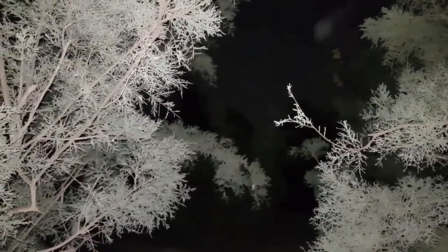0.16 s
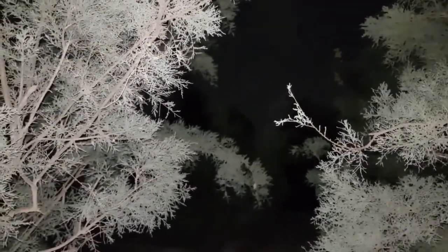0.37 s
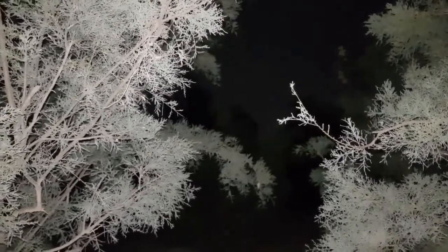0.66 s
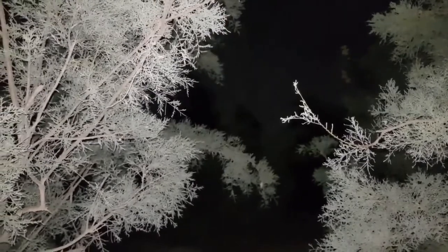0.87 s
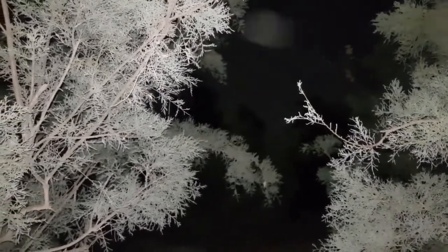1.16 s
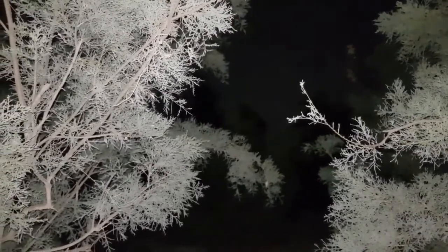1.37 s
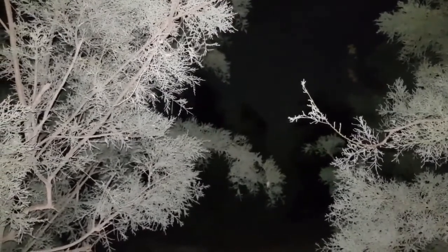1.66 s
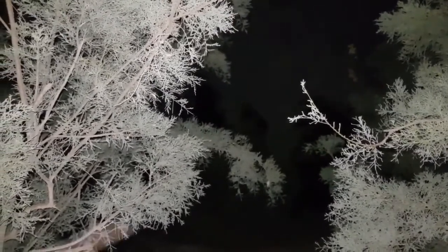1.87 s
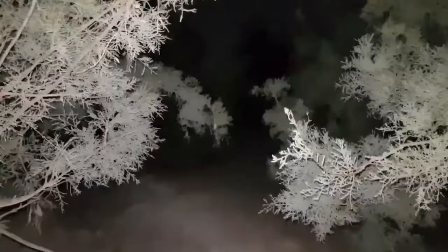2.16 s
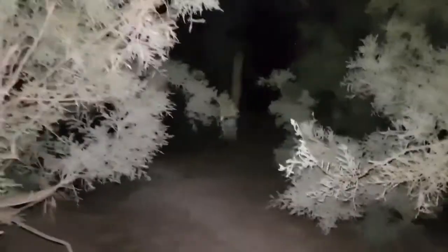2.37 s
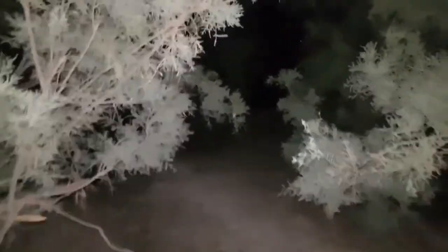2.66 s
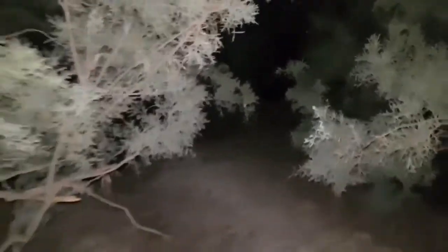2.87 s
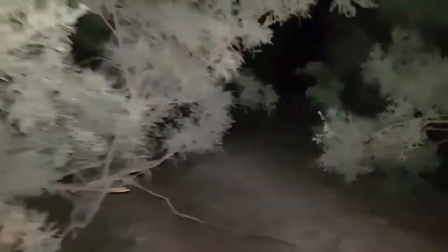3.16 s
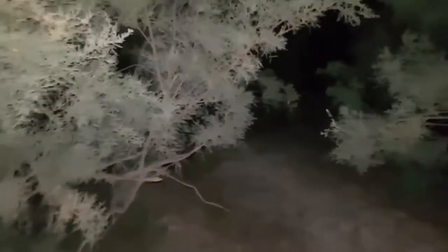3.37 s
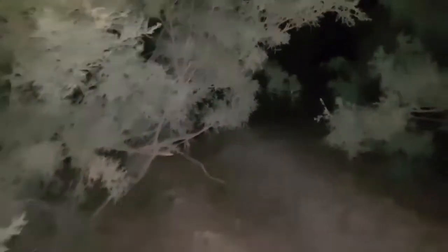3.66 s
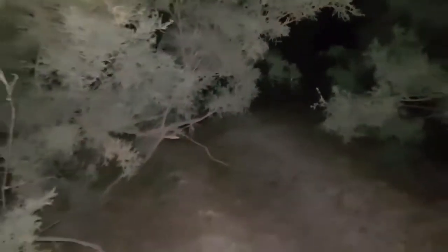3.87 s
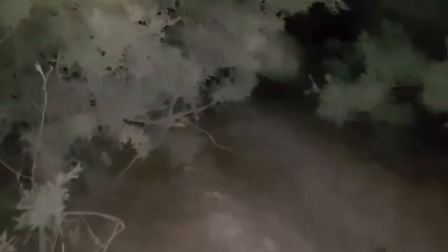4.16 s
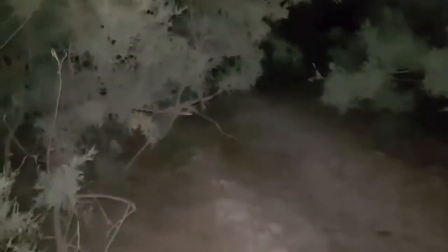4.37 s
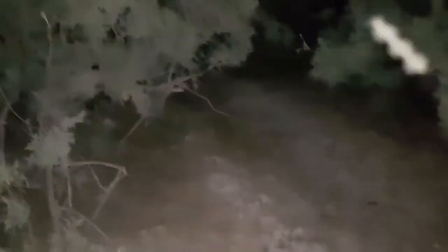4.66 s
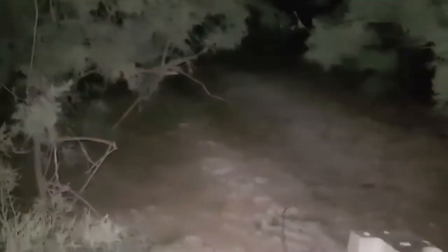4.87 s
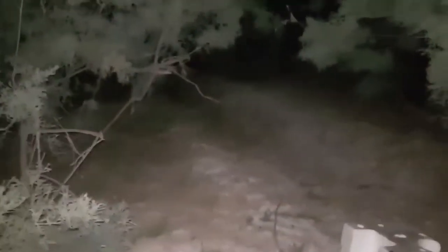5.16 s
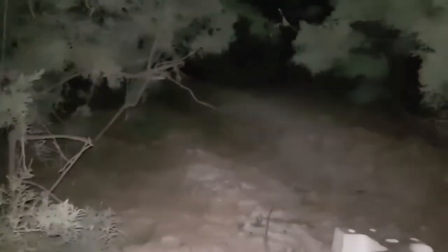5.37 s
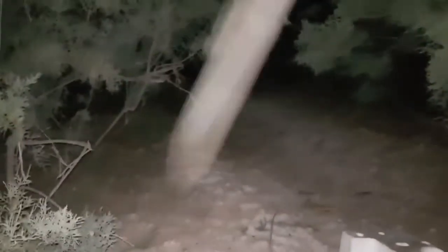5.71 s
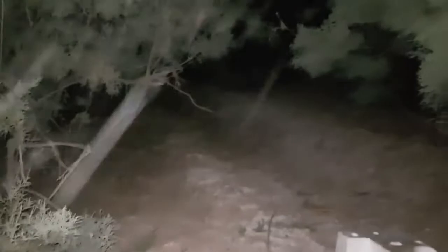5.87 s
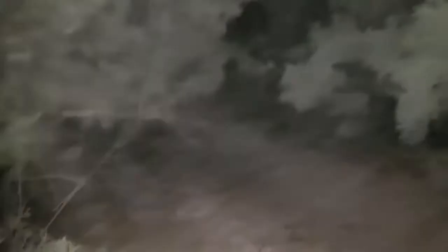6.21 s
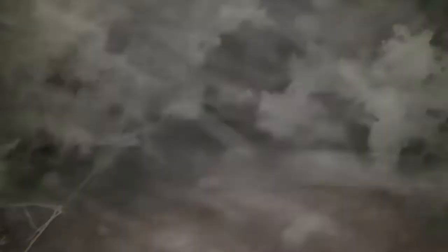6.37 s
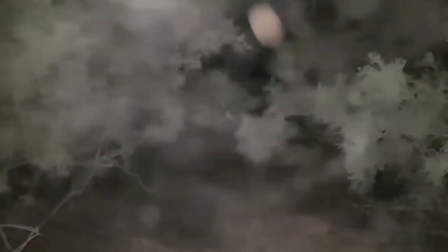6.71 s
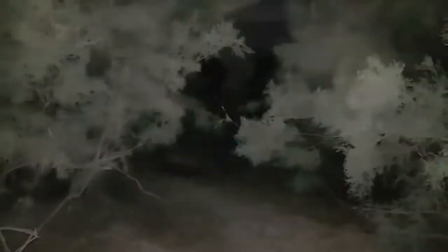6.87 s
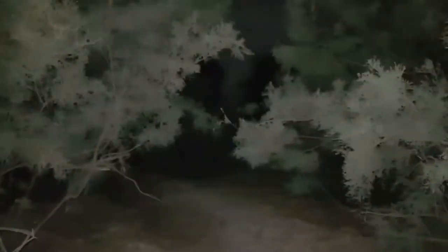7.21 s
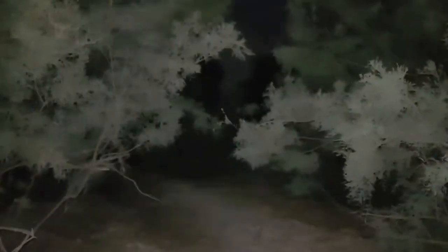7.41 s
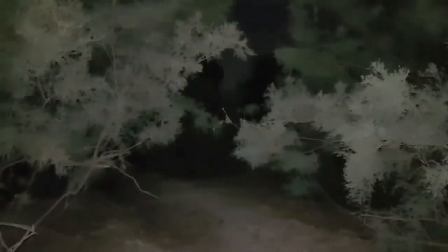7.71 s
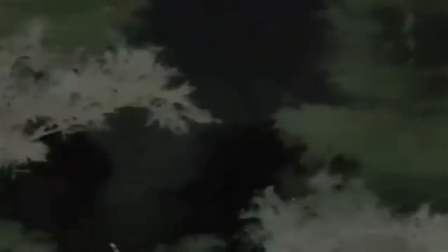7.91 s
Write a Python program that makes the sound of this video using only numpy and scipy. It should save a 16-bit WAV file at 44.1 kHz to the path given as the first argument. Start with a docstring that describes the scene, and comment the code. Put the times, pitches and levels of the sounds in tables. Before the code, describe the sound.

Outdoors at night among bushes, a near cricket sings regular phrases of four to six short falling notes around 4 kHz. Frogs click sharply with low knocks in overlapping runs, mostly during the first six and a half seconds. A soft toad trill, thin high insect trill and very high katydid buzz continue underneath, with a blended distant crowd and quiet hiss. The microphone is open and fairly close to the bushes.

```python
"""A night chorus among bushes. From the start a toad trills in tone pulses, a katydid buzzes in fast zips,
a thin trill near 4.8 kHz runs on and far callers blend into a crowd, over shaped air noise and scattered
tree echoes. A near cricket sings bell-shaped falling notes in phrases and frogs pair low knocks with sharp
clicks; soon come a lower cricket and fading chirps, then faint blips, purring pulses near 7 kHz and a
neighbour cricket's shorter notes; near 7.2 s one frog yelps in three partials."""
import sys
import numpy as np
from scipy import signal
from scipy.fft import rfft, irfft
from scipy.io import wavfile
from scipy.ndimage import uniform_filter1d

SR = 44100
rng = np.random.default_rng(int(sys.argv[2]) if len(sys.argv) > 2 else 0)


def amplitude_ratio(level_db):
    """Convert a level in decibels to the matching linear amplitude (field) ratio."""
    exponent = np.asarray(level_db, float) / 20
    return 10 ** exponent


def transcribe(signal):
    """Save signal, clipped to [-1, 1], as a 16-bit WAV file at the path in sys.argv[1]."""
    frames = np.atleast_2d(signal).T
    limited = np.clip(frames, -1, 1)
    pcm = np.round(limited * 32767).astype(np.int16)
    wavfile.write(sys.argv[1], SR, pcm)


N = 355005

# tone colour of the air noise: f/Hz, relative level per Hz/dB
AIR_COLOUR = [(25, -2.5), (40, -16), (70, -6), (135, 1), (300, -4), (800, -7), (1700, -2), (3000, 3.5),
              (5000, -7.5), (6000, -9.5), (7500, -18), (9500, -19), (11000, -13.5), (15500, -15)]
# far callers: t/s, crickets level/dB, dull frog clicks level/dB, frog knocks level/dB
DISTANT_LEVELS = [(0.0, -54, -55, -65), (1.3, -54.5, -55, -65), (2.4, -53.5, -55.5, -67.5),
                  (5.99, -53.5, -55.5, -66.5), (8.05, -54, -57.5, -69)]
# a small insect's purrs: start t/s, end t/s, middle level/dB, pulse rate/Hz
PURR_SPANS = [(1.414, 1.5, -75, 70.3), (1.697, 1.83, -72, 71.2), (1.954, 2.25, -72, 70.4),
              (2.355, 2.63, -71.5, 69.7), (2.771, 3.02, -73, 68.7), (3.152, 3.41, -70.5, 68.7),
              (3.554, 3.82, -70.5, 68.4), (3.954, 4.25, -70.5, 68.4), (6.438, 6.6, -75.5, 70.3),
              (6.78, 6.96, -76, 70.2), (7.141, 7.39, -75, 69.2), (7.563, 7.72, -76, 69.5)]
# short chirps: t/s, level of the first pulse/dB
CHIRP_STARTS = [(.53, -71), (1.08, -71), (2.88, -69), (3.66, -72), (4.32, -70.5), (4.99, -71),
                (5.62, -72.5), (6.92, -72), (7.6, -72)]
# the katydid's loudness: t/s, level/dB
KATYDID_LEVELS = [(0, -79), (.75, -78), (2, -80), (4, -79), (5, -81), (6.8, -79.5), (8.05, -78)]
# the katydid's wing strokes: t/s, stroke rate/Hz
KATYDID_RATES = [(0, 122.3), (.7, 123.2), (1.2, 122.6), (1.8, 123.5), (3, 123.4), (3.7, 122.6), (5, 122.1),
                 (8.05, 121.8)]
# tones at which the katydid's wing rings: f/Hz, width/Hz, level/dB
WING_MODES = [(10720, 620, 10.5), (11950, 420, 9), (13400, 900, 7.5), (14500, 620, 4)]
# the toad's loudness: t/s, level/dB
TOAD_LEVELS = [(0, -67.5), (3, -69.5), (4.2, -65), (6, -66), (8.05, -64.5)]
# the toad's pulses: t/s, pulse rate/Hz
TOAD_RATES = [(0, 55.6), (3, 55.3), (4.2, 54), (5.3, 55.2), (7, 54.2), (8.05, 54.5)]
# stretches of steady frog calling; one frog may fill several rows:
# first t/s, halfway t/s, last t/s (all of the clicks), number of calls,
# middle click level/dB, middle click f/Hz, middle knock level/dB
CALL_STRETCHES = [(.037, .517, 1.013, 9, -41, 2700, -53), (.07, .324, .578, 5, -44, 2650, -50),
                  (.112, .227, .351, 3, -36.5, 2530, -58), (.138, .434, .742, 6, -45, 3000, -60),
                  (.706, .905, 1.106, 4, -36.5, 2700, -48), (.855, 1.59, 2.346, 14, -38, 2620, -52),
                  (1.071, 1.494, 1.94, 9, -47, 2500, -51), (2.051, 2.723, 3.413, 12, -37.5, 2480, -51.5),
                  (2.454, 3.377, 4.334, 16, -39, 2560, -55), (2.53, 2.709, 2.9, 4, -38, 2650, -52),
                  (3.52, 3.834, 4.154, 6, -39, 2430, -59), (4.424, 4.546, 4.669, 3, -40, 2850, -58),
                  (4.934, 5.313, 5.709, 8, -38, 2680, -53), (5.442, 6.008, 6.604, 11, -41.5, 2950, -55),
                  (5.823, 6.228, 6.662, 8, -37.5, 2580, -53)]
# further frog clicks, without a knock tied to them: t/s, level/dB, f/Hz
FURTHER_CLICKS = [(.315, -39, 2540), (.785, -37.5, 2655), (.814, -38, 2630), (1.015, -39, 2320),
                  (1.189, -32.5, 2280), (1.855, -42, 2430), (2.216, -41, 3020), (2.332, -41.5, 3000),
                  (3.458, -36, 2365), (3.702, -36.5, 2650), (3.798, -42, 2260), (3.937, -39.5, 2320),
                  (4.907, -46, 2270), (7.578, -41, 2595)]
# further frog knocks, some continuing a run, without a click in this table: t/s, level/dB
FURTHER_KNOCKS = [(.756, -48.5), (.9, -54), (1.031, -53.5), (1.233, -48), (1.447, -51), (5.069, -55),
                  (5.291, -54), (5.549, -51), (5.563, -46.5), (5.804, -57)]
# faint low falling blips: t/s, level/dB, f/Hz
LOW_BLIPS = [(1.192, -69, 902), (4.111, -67, 891), (4.471, -66, 1000), (5.475, -69, 1030), (5.89, -67, 966),
             (6.163, -65, 1040), (7.233, -68, 751)]
# the partials of one longer frog yelp: t/s, level/dB, f/Hz
YELP_PARTIALS = [(7.16, -36, 2436), (7.162, -47, 2860), (7.163, -59, 2010)]
# a lower cricket's phrases: first note t/s, last note t/s, level/dB
LOW_CRICKET_PHRASES = [(0.489, .59, -51), (0.713, .865, -53), (0.989, 1.145, -49.5), (3.55, 3.705, -50),
                       (3.865, 3.975, -50.5), (4.105, 4.255, -50.5), (7.672, 7.82, -51.5),
                       (7.946, 8.05, -50)]
# short falling ticks near 4.7 kHz: t/s, level/dB
FALLING_TICKS = [(0.338, -66.0), (0.714, -64.5), (0.997, -67), (1.072, -59), (1.353, -60), (1.421, -61),
                 (1.741, -61), (1.815, -62.8), (2.191, -62.6), (2.454, -65.8), (2.877, -66), (2.949, -67),
                 (3.192, -63), (3.625, -61), (3.986, -62), (4.714, -64.2), (5.15, -65.9), (5.222, -64.1),
                 (6.406, -67), (6.475, -65), (6.732, -68), (7.599, -62)]
# single notes of other crickets: t/s, level/dB, f/Hz
SINGLE_NOTES = [(.131, -51, 4000), (.582, -47, 3710), (1.81, -45, 3870), (4.359, -49, 4100),
                (4.554, -47.5, 3840), (4.907, -43, 3880), (5.606, -41, 3930), (6.178, -43, 3880)]
# a neighbour cricket's phrases: first note t/s, last note t/s, middle level of the later notes/dB,
# middle f/Hz, octave level relative to the note/dB
SHORT_NOTE_PHRASES = [(1.512, 1.67, -46.5, 3650, -22), (1.845, 1.967, -39.5, 3730, -32),
                      (2.14, 2.304, -39.5, 3753, -33), (2.436, 2.603, -38, 3750, -33),
                      (2.729, 2.896, -39, 3745, -33), (3.025, 3.195, -40, 3764, -32),
                      (3.342, 3.467, -43.5, 3790, -33), (6.162, 6.286, -44, 3790, -36),
                      (6.462, 6.582, -46.5, 3795, -33), (6.767, 6.851, -43, 3780, -36),
                      (7.071, 7.15, -45, 3800, -30), (7.367, 7.516, -49.5, 3640, -19),
                      (7.698, 7.859, -43, 3726, -28), (7.996, 8.034, -38, 3760, -29)]
# the near cricket's phrases: first note t/s, last note t/s, middle level of the later notes/dB, middle f/Hz
LONG_NOTE_PHRASES = [(0.027, 0.307, -40, 4016), (0.633, 0.923, -39.5, 4000), (1.88, 2.159, -40, 4040),
                     (2.53, 2.742, -41.5, 4075), (3.036, 3.318, -41.5, 4026), (3.605, 3.893, -40.5, 4016),
                     (4.197, 4.487, -40.5, 4030), (4.781, 5.14, -41.5, 4114), (5.426, 5.706, -39, 4085),
                     (5.999, 6.286, -40, 4050), (6.592, 6.873, -39, 4050), (7.189, 7.542, -39, 4055),
                     (7.841, 8.054, -39.5, 4050)]


def evened(x):
    """Scales a sound to an rms (average strength) of 1."""
    return x / np.sqrt(np.mean(x ** 2) + 1e-20)


def curve(rows):
    """Joins the rows of a table with straight lines, giving one value per sample for each column."""
    s, *columns = np.transpose(rows)
    return [np.interp(np.arange(N) / SR, s, column) for column in columns]


def note(hz, rise, fall, glide_hz=0., bend_hz=0., octave_db=-90, start=3.7, octave_lag=0.71):
    """A bell-shaped tone, loudest in the middle; its pitch falls glide_hz per rise time and curves by bend_hz.

    It is cut in `start` rise times before its middle; its octave peaks octave_lag rise times after it."""
    t = np.arange(-2600, 2601) / SR
    u = np.clip(t / rise, -4, 4)  # time counted in rise times
    pitch = hz - glide_hz * u + bend_hz * u ** 2
    turn = 2 * np.pi * np.cumsum(pitch) / SR + 2 * np.pi * rng.random()
    bell = np.exp(-.5 * (t / np.where(t < 0, rise, fall)) ** 2)
    shape = bell * np.clip((u + start) / 0.1, 0, 1)
    octave_shape = np.roll(shape, round(octave_lag * rise * SR))
    return shape * np.sin(turn) + amplitude_ratio(octave_db) * octave_shape * np.sin(2 * turn)


def add(mix, s, sound):
    """Mixes a sound in with its middle at time s."""
    at = round(s * SR) - len(sound) // 2
    part = mix[max(at, 0):max(at + len(sound), 0)]
    part += sound[max(-at, 0):][:len(part)]


def played(rows, **shape):
    """Plays each row (t/s, level/dB, f/Hz) as one note."""
    out = np.zeros(N)
    for s, db, hz in rows:
        add(out, s, amplitude_ratio(db) * note(hz, **shape))
    return out


def beats(per_s, start):
    """Gives one unit click each time the running count of pulses passes a whole number."""
    count = start + np.cumsum(per_s * np.ones(N)) / SR
    return np.diff(np.floor(count), prepend=np.floor(start))


def phrase(first, last, db, hz, gap, hurry, soft_db):
    """The notes of one phrase: the first ones come a little faster and softer than the rest."""
    k = np.arange(round((last - first) / gap) + 1)
    fresh = np.exp(-k / 1.2)  # 1 on the first note, then fading
    place = k + hurry * (fresh - 1)
    times = first + (last - first) * place / place[-1]
    odd = rng.standard_normal((len(k), 2))
    levels = db - soft_db * fresh ** 2 + .6 * odd[:, 0]
    pitches = hz + 20 * odd[:, 1]
    return zip(times, levels, pitches)


def air():
    """Far traffic hum, leaves and microphone hiss as one smooth, faintly patchy noise floor."""
    frames, hz = N // 256 + 5, np.fft.rfftfreq(1024, 1 / SR)
    a, b, patches = rng.standard_normal((frames, 513, 3)).T
    patches = uniform_filter1d(patches, 12, 0)  # smooth over pitch, then over time
    patches = evened(uniform_filter1d(patches, 14, 1))
    f, db = np.transpose(AIR_COLOUR)
    colour_db = np.interp(np.log(hz + 1), np.log(f), db)[:, None]
    spectrum = (a + 1j * b) * amplitude_ratio(colour_db + 1.1 * patches)
    noise = signal.istft(spectrum, nperseg=1024, noverlap=768)[1][:N]
    return amplitude_ratio(-63) * evened(noise)


def trees(x):
    """Scattered echoes off trunks and leaves, modelled as a noise tail falling 60 dB in 0.4 s."""
    t = np.arange(SR // 2) / SR
    tail = rng.standard_normal(len(t)) * amplitude_ratio(-60 * t / .4)
    tail *= np.clip(t / .006, 0, 1)
    return signal.oaconvolve(x, tail / np.linalg.norm(tail))[:N]


def crowd(count, hz, spread_hz, per_s, uneven, phrase_s, singing, spread_db, **shape):
    """Many unseen callers, most near the middle pitch, each with its own pace and pauses."""
    out, t = np.zeros(N), np.arange(N) / SR
    for rank, (pace, phase, turn) in zip(np.linspace(-1, 1, count), rng.random((count, 3))):
        wander = evened(uniform_filter1d(rng.standard_normal(N), 2000))
        calls = beats(per_s * (.7 + .6 * pace) * np.exp(uneven * wander), phase)
        # sing for only part of each phrase
        calls *= (t / (phrase_s * (.8 + .4 * pace)) + turn) % 1 < singing
        calls *= amplitude_ratio(spread_db * rng.standard_normal(N))
        pitch = hz + spread_hz * (rank + rank ** 3) / 2
        out += signal.oaconvolve(calls, note(pitch, **shape), "same")
    return evened(out)


def distant():
    """The far chorus: falling cricket notes, frog clicks (dull ones and fewer sharp ones) and knocks."""
    crickets_db, clicks_db, knocks_db = curve(DISTANT_LEVELS)
    crickets = crowd(count=17, hz=3875, spread_hz=320, per_s=20, uneven=.05, phrase_s=.5, singing=.75,
                     spread_db=3.5, rise=.009, fall=.006, glide_hz=150, bend_hz=10, octave_db=-40)
    dull = crowd(count=14, hz=2335, spread_hz=340, per_s=28, uneven=.4, phrase_s=.7, singing=.8,
                 spread_db=1.5, rise=.0011, fall=.0018)
    sharp = crowd(count=5, hz=2867, spread_hz=250, per_s=13, uneven=.15, phrase_s=1.0, singing=0.73,
                  spread_db=4.5, rise=.0005, fall=.0008)
    knocks = crowd(count=8, hz=1300, spread_hz=121.1, per_s=22, uneven=.25, phrase_s=.6, singing=.7,
                   spread_db=-0.5, rise=.0015, fall=.0027)
    far_frogs = amplitude_ratio(clicks_db) * (dull + amplitude_ratio(-11.5) * sharp) + amplitude_ratio(knocks_db) * knocks
    return amplitude_ratio(crickets_db) * crickets, far_frogs


def small_insects():
    """Purrs of even pulses, chirps of five fading pulses and an unbroken thin trill near 4.8 kHz."""
    purrs = []
    for start, end, db, per_s in PURR_SPANS:
        for s in np.arange(start, end, 1 / per_s):
            purrs.append((s, db + 1.3 * rng.standard_normal(), 7000 + 30 * rng.standard_normal()))
    chirps = [(s + 0.014 * k, db - k, 6520) for s, db in CHIRP_STARTS for k in range(5)]
    trill_rate = 57 + 3 * evened(uniform_filter1d(rng.standard_normal(N), 3000))
    pulses = beats(trill_rate, .3) * amplitude_ratio(3 * rng.standard_normal(N) - 74)
    trill = signal.oaconvolve(pulses, note(4880, rise=.002, fall=.0025, glide_hz=60), "same")
    return played(purrs, rise=0.0022, fall=0.002) + played(chirps, rise=.002, fall=.004) + trill


def katydid():
    """Very evenly spaced wing strokes, each a brief falling zip, coloured by the wing's ringing modes."""
    (level_db,), (per_s,) = curve(KATYDID_LEVELS), curve(KATYDID_RATES)
    strokes = beats(per_s, 0.69) * amplitude_ratio(1.6 * rng.standard_normal(N))
    kind, zips = rng.integers(0, 4, N), np.zeros(N)  # each stroke takes one of four pitches
    for k, hz in enumerate(np.linspace(11600, 13600, 4)):
        zip_sound = note(hz, rise=0.00052, fall=0.00093, glide_hz=890)
        zips += signal.oaconvolve(strokes * (kind == k), zip_sound, "same")
    hz = np.fft.rfftfreq(N, 1 / SR)
    wing = sum(amplitude_ratio(db) / (1 + (2 * (hz - f) / width) ** 2) for f, width, db in WING_MODES)
    return amplitude_ratio(level_db) * evened(irfft(rfft(zips) * wing, N))


def toad():
    """An unbroken trill of short tone pulses at 2060 Hz."""
    (level_db,), (per_s,) = curve(TOAD_LEVELS), curve(TOAD_RATES)
    pulses = beats(per_s, .3) * amplitude_ratio(0.28 * rng.standard_normal(N))
    trill = signal.oaconvolve(pulses, note(2060, rise=0.0022, fall=0.0035), "same")
    return amplitude_ratio(level_db) * evened(trill)


def click(hz):
    """A frog's click rings at its pitch and, more faintly, in a higher throat mode."""
    throat = note(3210, rise=0.00027, fall=0.00036)
    return note(hz, rise=0.00055, fall=0.00094, glide_hz=39.47) + amplitude_ratio(-4.5) * throat


def frog_calls():
    """Lists all clicks and knocks; within a stretch the gap between calls changes steadily."""
    knock_lead_s = .009  # a knock comes about this long before its click
    clicks, knocks = list(FURTHER_CLICKS), list(FURTHER_KNOCKS)
    for first, halfway, last, calls, click_db, hz, knock_db in CALL_STRETCHES:
        pace = np.polyfit([0, .5, 1], [first, halfway, last], deg=2)
        times = np.polyval(pace, np.linspace(0, 1, round(calls)))
        for s, (a, b, c, d) in zip(times, rng.standard_normal((len(times), 4))):
            clicks.append((s, click_db + a, hz + 50 * b))
            knocks.append((s - knock_lead_s + 0.001037 * c, knock_db + 0.4 * d))
    return clicks, knocks


def frogs():
    """The clicks, knocks, low blips and the yelp that stand out of the chorus, each made of short tones."""
    clicks, knocks = frog_calls()
    knock_notes = [(s, db, 1320 + 35 * rng.standard_normal()) for s, db in knocks]
    out = played(knock_notes, rise=0.0026, fall=0.0028)
    out += played(LOW_BLIPS, rise=0.0081, fall=0.011, glide_hz=40)
    out += played(YELP_PARTIALS, rise=0.0017, fall=0.0058, glide_hz=14.7)
    for s, db, hz in clicks:
        add(out, s, amplitude_ratio(db) * click(hz))
    return out


def neighbours():
    """Other crickets near enough to follow note by note, each note a short falling tone."""
    short = dict(rise=.007, fall=0.0063, glide_hz=111.44, bend_hz=5.18)
    out = played(SINGLE_NOTES, octave_db=-32, **short)
    for *row, octave_db in SHORT_NOTE_PHRASES:
        out += played(phrase(*row, gap=.0412, hurry=.02, soft_db=5), octave_db=octave_db, **short)
    low = [(s, db, 3500) for first, last, db in LOW_CRICKET_PHRASES for s in np.arange(first, last, .037)]
    out += played(low, rise=0.00608, fall=0.0076, glide_hz=127.6, octave_db=-31)
    ticks = [(s, db, 4700 + 60 * rng.standard_normal()) for s, db in FALLING_TICKS]
    return out + played(ticks, rise=0.0053, fall=0.0026, glide_hz=92.4)


def long_note(hz):
    """The wing first catches with a faint high tick, then scrapes through a swelling, falling note."""
    scrape = note(hz, rise=0.0099, fall=0.0064, glide_hz=180 + 10 * rng.standard_normal(), bend_hz=18,
                  octave_db=-40.5, start=3.2, octave_lag=-1.6)
    tick = note(4880 + 60 * rng.standard_normal(), rise=0.00071, fall=0.01, glide_hz=40.2)
    early_tick = np.roll(tick, -round(0.031 * SR))
    return scrape + amplitude_ratio(-20) * early_tick


def near_cricket():
    """Phrases of four to six long notes, each one scrape of the wings."""
    out = np.zeros(N)
    for row in LONG_NOTE_PHRASES:
        for s, db, hz in phrase(*row, gap=.071, hurry=.15, soft_db=1.5):
            add(out, s, amplitude_ratio(db) * long_note(hz))
    return out


def scene():
    """Mixes near callers with a little echo, far ones with more, over the air noise."""
    near = near_cricket() + neighbours() + small_insects() + katydid() + toad()
    near_frogs = frogs()
    far_crickets, far_frogs = distant()
    far_send = amplitude_ratio(-5) * far_crickets + amplitude_ratio(-10) * far_frogs
    echo = trees(amplitude_ratio(-19.0) * near + amplitude_ratio(-20.5) * near_frogs + far_send)
    return (near + near_frogs + far_crickets + far_frogs + echo + air())[None]


def band_limit(x):
    """A steep low-pass at the top of the band."""
    return signal.sosfilt(signal.butter(12, 15550, fs=SR, output="sos"), x)


def record(dry):
    """The converter sits slightly off zero, a constant shift downwards."""
    mix = dry - amplitude_ratio(-67.5)
    return band_limit(mix)


dry = scene()
out = record(dry)
transcribe(out)
```